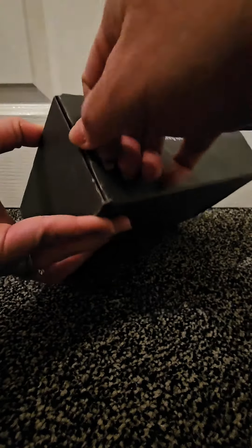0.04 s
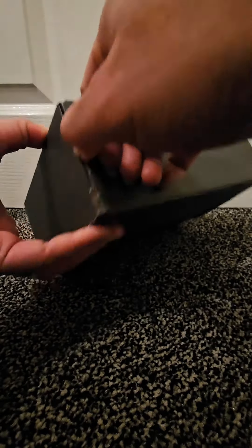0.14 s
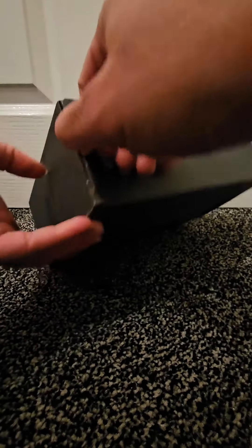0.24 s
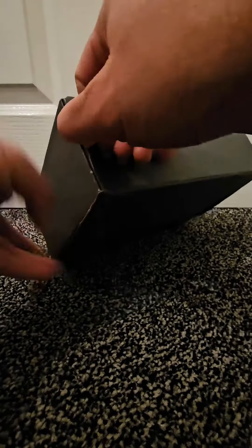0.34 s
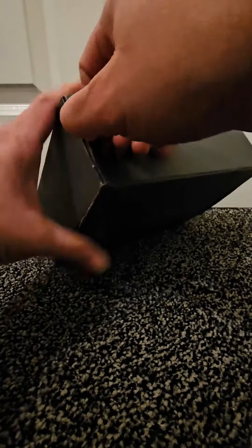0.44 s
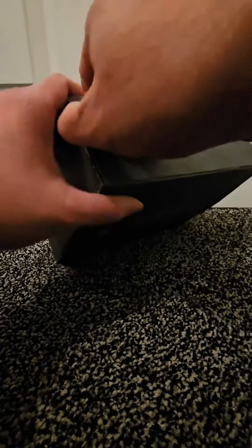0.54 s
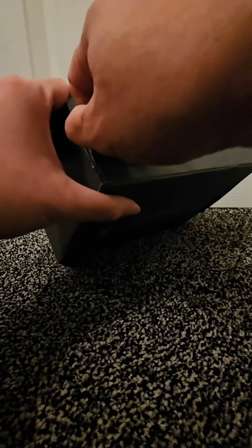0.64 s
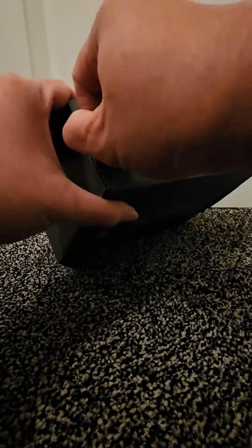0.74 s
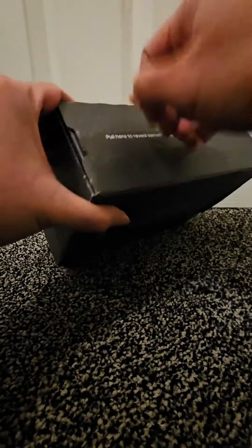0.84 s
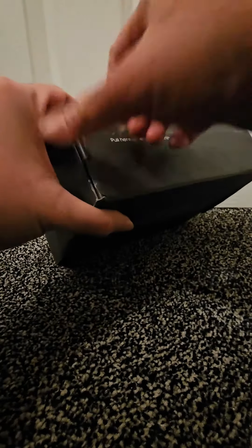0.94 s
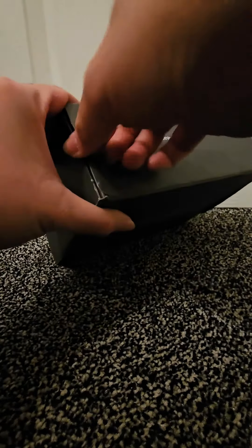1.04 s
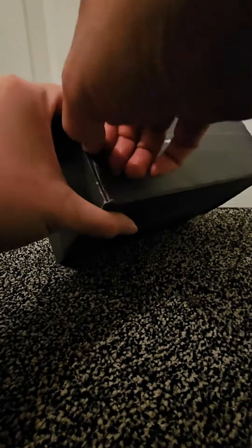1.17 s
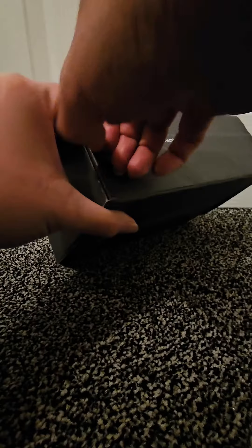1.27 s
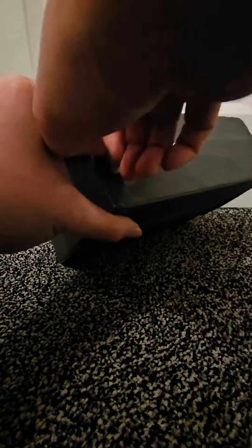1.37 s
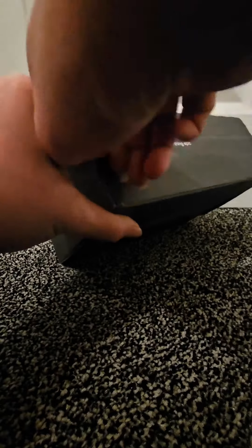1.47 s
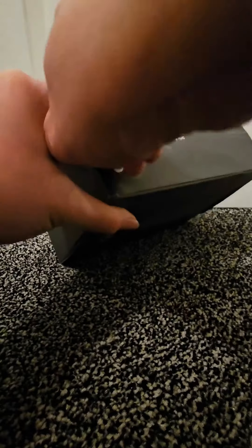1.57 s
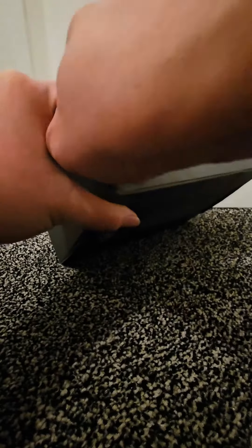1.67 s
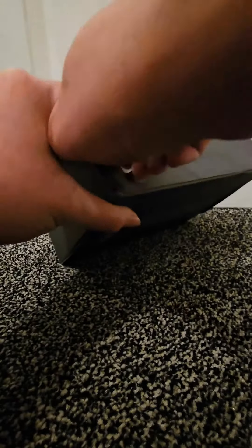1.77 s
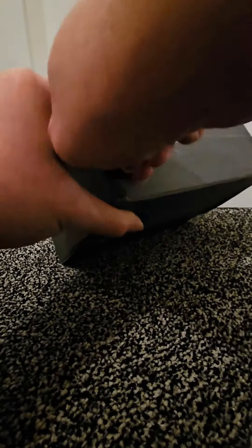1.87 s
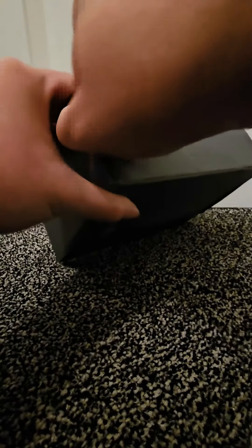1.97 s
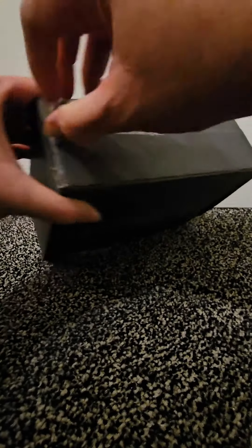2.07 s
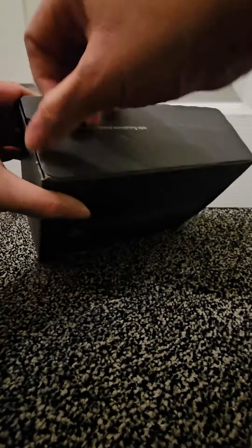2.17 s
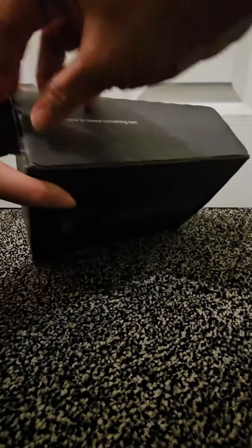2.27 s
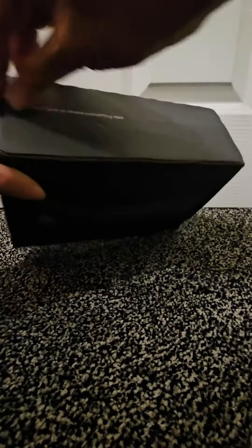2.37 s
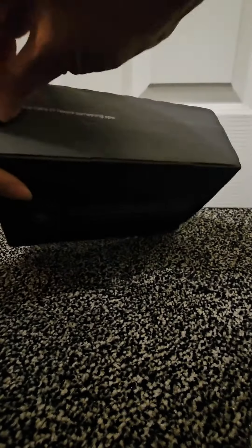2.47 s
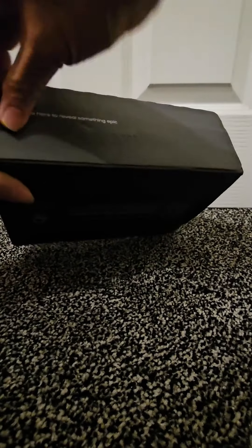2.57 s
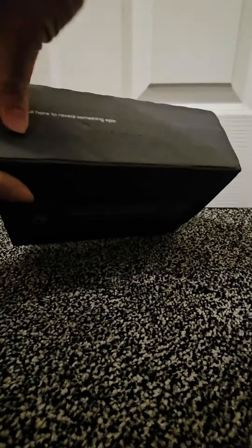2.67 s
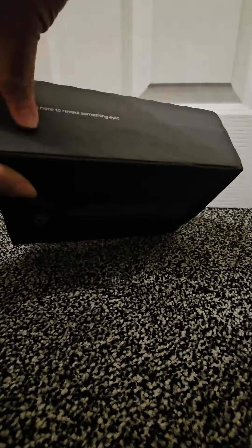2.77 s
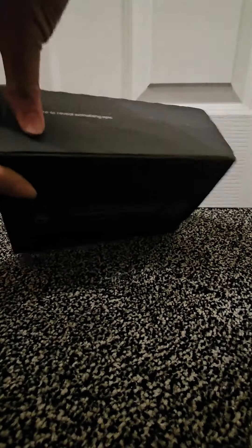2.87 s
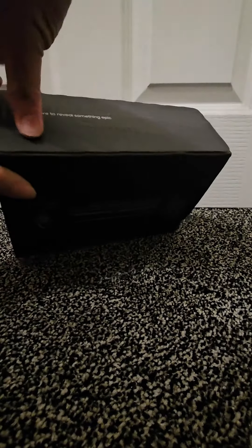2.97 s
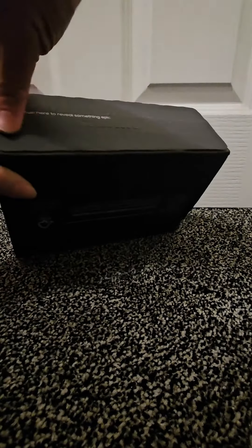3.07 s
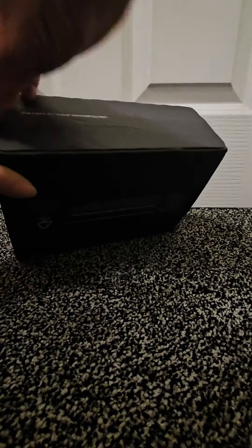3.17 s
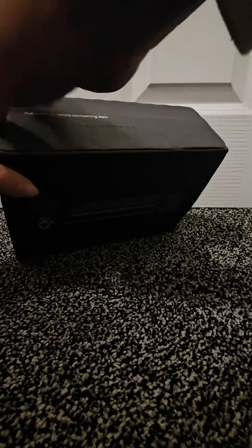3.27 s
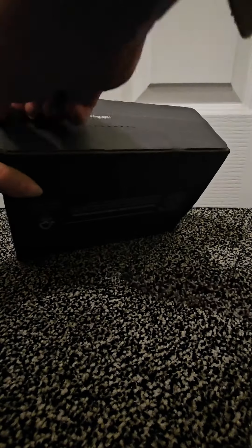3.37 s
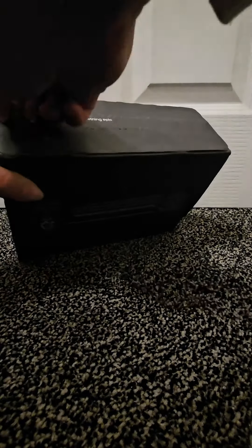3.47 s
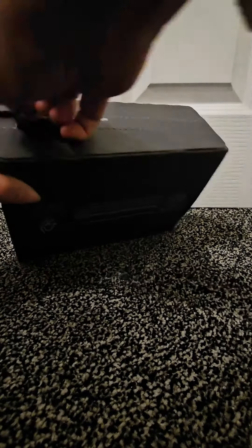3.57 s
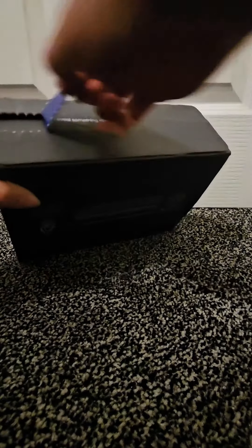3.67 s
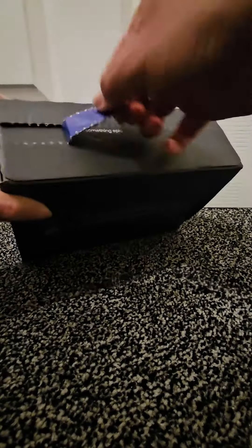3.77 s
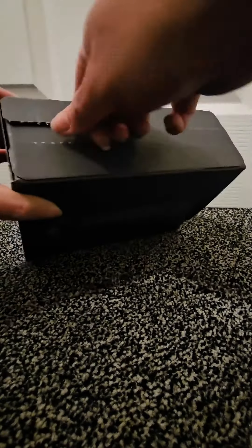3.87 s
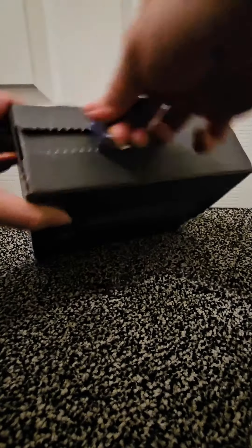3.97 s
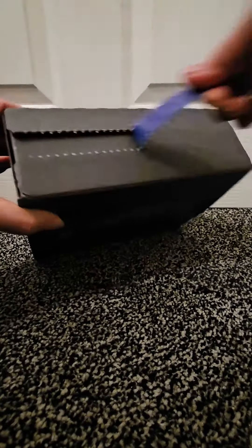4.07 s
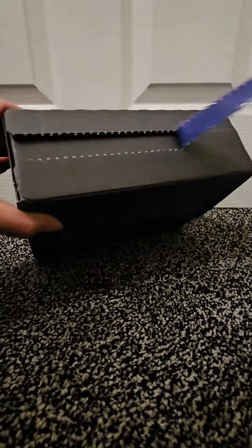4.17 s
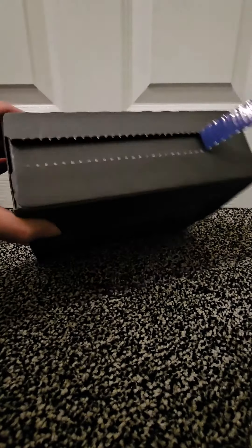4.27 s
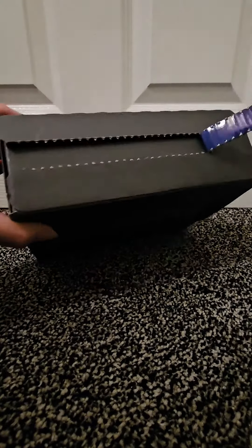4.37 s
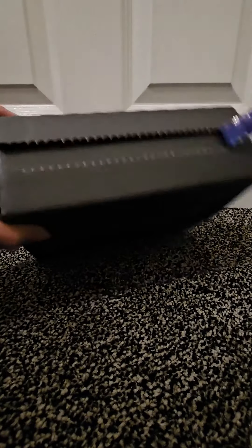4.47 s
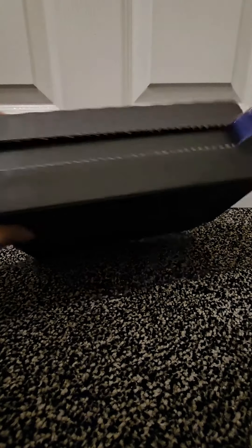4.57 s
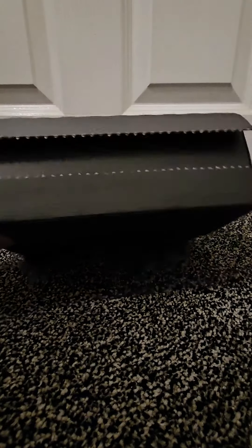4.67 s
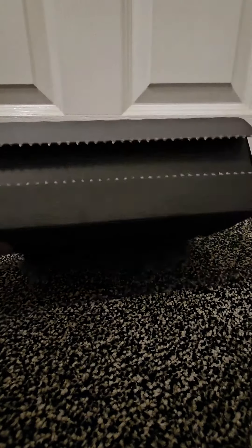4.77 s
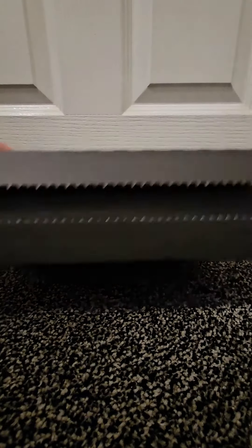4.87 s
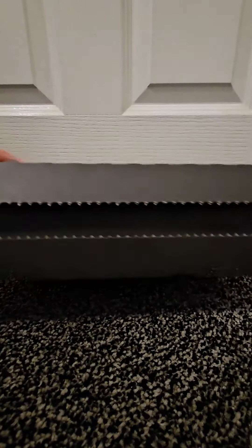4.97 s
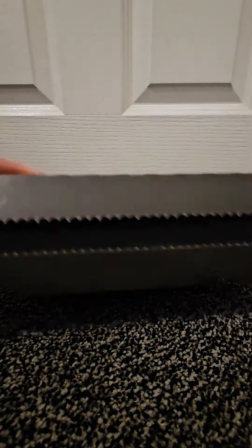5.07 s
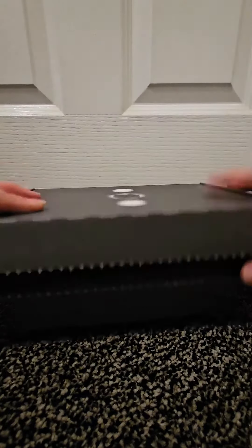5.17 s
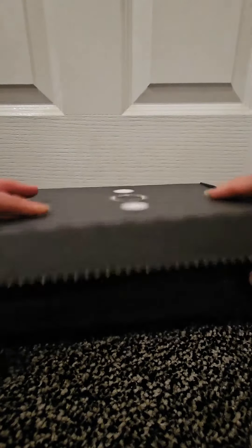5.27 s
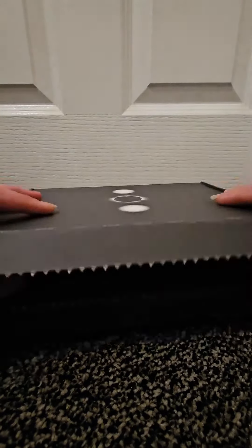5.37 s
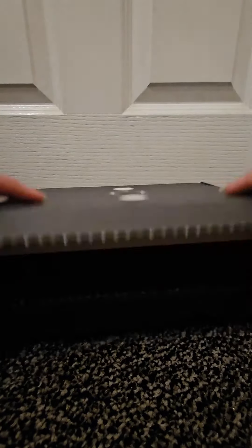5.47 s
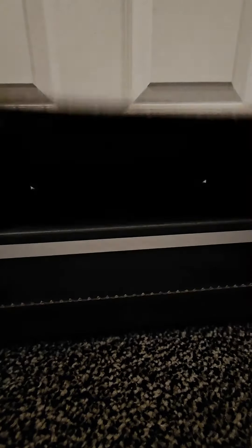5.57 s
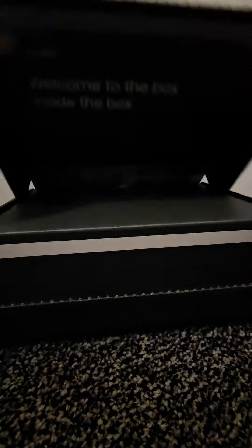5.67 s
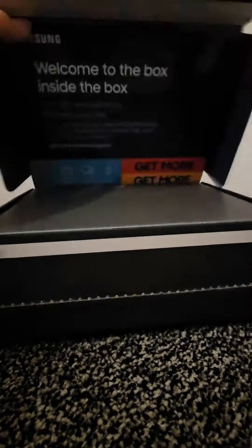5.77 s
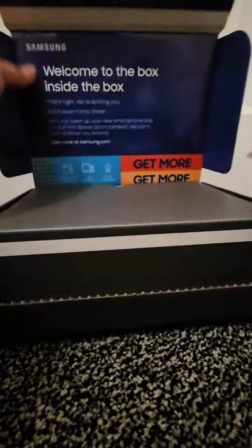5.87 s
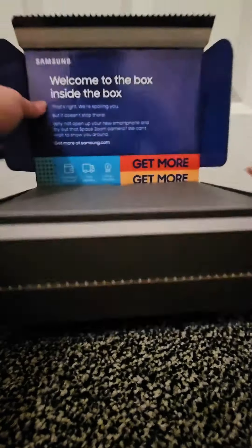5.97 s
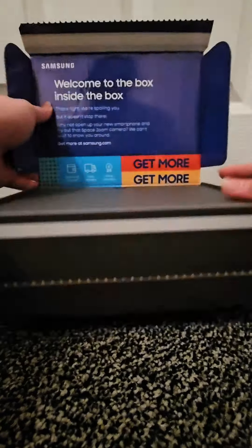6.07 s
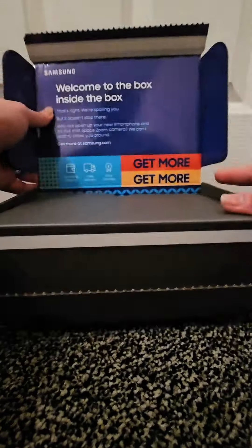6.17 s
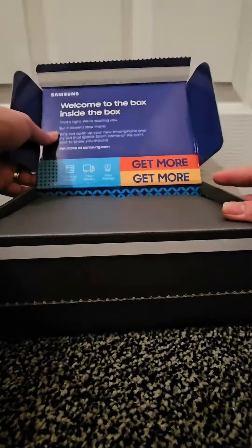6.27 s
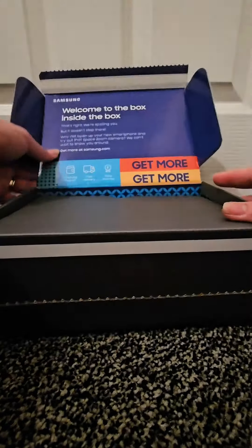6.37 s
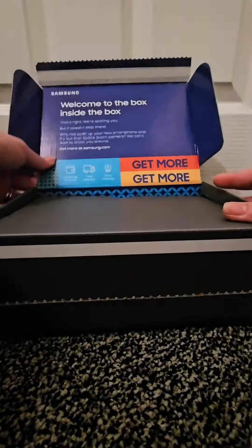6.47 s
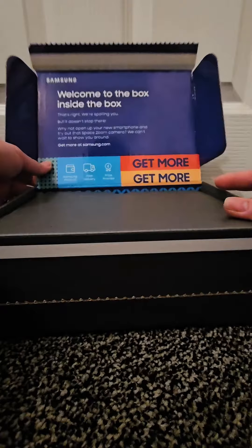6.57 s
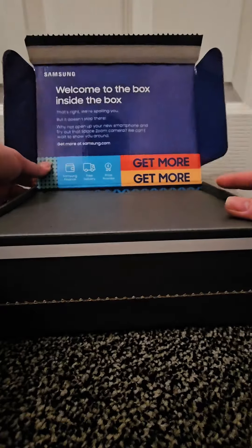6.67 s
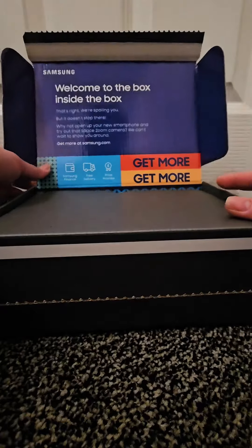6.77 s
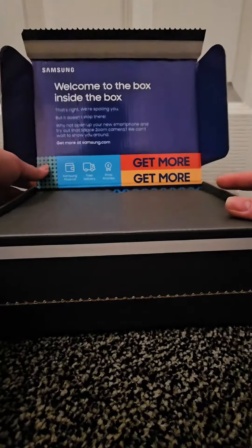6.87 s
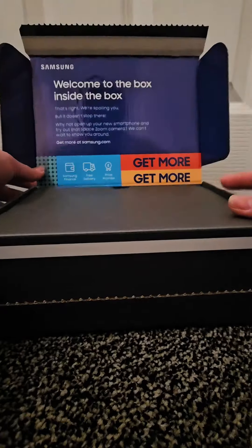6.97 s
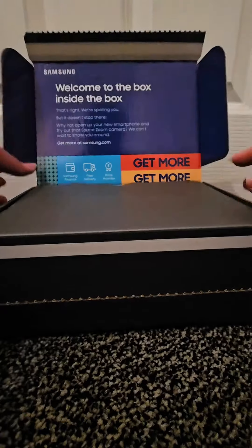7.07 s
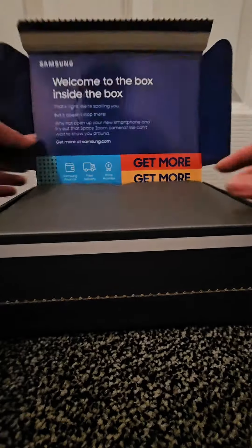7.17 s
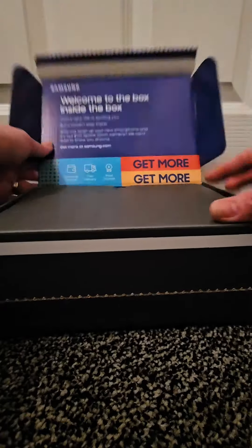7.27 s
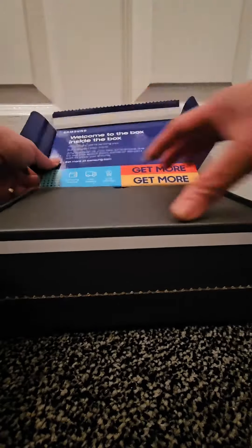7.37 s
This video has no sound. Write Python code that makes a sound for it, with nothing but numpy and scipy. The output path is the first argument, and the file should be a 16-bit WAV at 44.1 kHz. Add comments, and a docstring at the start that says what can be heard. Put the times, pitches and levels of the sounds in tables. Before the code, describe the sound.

A cardboard box is handled on carpet in a small, dry room, heard very close by a phone, the right side more muffled. From 0 to 2 s fingers scuff and pick at the card: faint rubs, tiny ticks, soft hollow taps, with firmer knocks near 1.0 and 1.7 s. From 2.2 to 3.6 s it is quieter, with light sliding strokes and a small nail snap around 3.4 s. At 3.75 s the strip starts to tear: a short crackling jerk, a pause, the longest and loudest rip at 4.2-4.45 s, then two shorter ones at 4.65 and 4.8 s, toothy and bright over hollow booming. Low bumps and rubs follow around 5-5.5 s. Near 5.8-6 s the flaps slide with a brief papery rush ending in a thud. Soft scuffs thin out to near quiet about 7 s; a double knock comes at 7.3 s.

```python
"""Two hands turn a cardboard box on a carpet, pick at its tab, rip a perforated strip and lift the lid.
Stroked, the box drums as noise through its resonances; knocked, its panels ring as decaying sines.
Skin and card scuff and hiss as coloured noise; fibres snap as short puffs. The room is small and dry.
A phone close by hears it through two far-apart ports, the right one muffled."""
import sys
import numpy as np
from scipy import signal
from scipy.fft import rfft, irfft, next_fast_len
from scipy.io import wavfile
from scipy.ndimage import uniform_filter1d, map_coordinates

SR = 44100
rng = np.random.default_rng(int(sys.argv[2]) if len(sys.argv) > 2 else 0)


def materialize(psi):
    """Save the field psi as 16-bit PCM at rate SR to the path in sys.argv[1].

    A 1-D psi becomes a single channel; in a 2-D psi each row is a channel.
    """
    bounded = np.clip(np.atleast_2d(psi).T, -1, 1)
    quanta = np.round(bounded * 32767).astype(np.int16)
    wavfile.write(sys.argv[1], SR, quanta)


N = 327222

# Room tone. Each row: frequency in Hz, density in dB per Hz.
ROOM_TONE_HZ_DB = [(15, -21.5), (25, -0.5), (210, -4.5), (306, -17), (633, -7.5), (1180, -22.5),
                   (1350, -21), (15600, -42.5)]
# Decay of the room. Each row: frequency in Hz, t60 in s.
ROOM_HZ_T60_S = [(200, 0.16), (2000, 0.017), (10000, 0.0092)]
# Port mismatch. Each row: frequency in Hz, excess of the left port over the right in dB.
MUFFLE_HZ_DB = [(60, 1.5), (110, 7.5), (200, -0.5), (380, -3.5), (700, 2), (1290, 4.0), (2380, 5),
                (4400, 16), (8120, 24.5), (15000, 21.5)]
# Ports seeing different faces as the box turns. Each row: time in s, mean phase lead of the right port in rad.
TURN_S_RAD = [(0, -1.33), (3, -0.28), (3.8, -0.5), (4.3, -1), (4.8, -2), (5.4, 1.75), (5.8, -0.16),
              (6.3, 1.3), (6.9, -0.5), (7.4, -1.4)]
# Colour drift as the box is turned. Each row: time in s, brightness tilt of the drumming in dB,
# tilt of the thump towards the bass in dB.
GRIP_S_DB = [(0, -1.5, -5.5), (1, -2, 3), (2, -7.5, -6.5), (3, -0.5, 2), (3.8, -12.5, 12), (4.5, 0, 15.5),
             (5.2, -3.5, -7.5), (6, 4.5, 2), (6.6, -1, 2.5), (7.3, -7, -8)]

# Box pressed into the carpet. Each row: start in s, length in s, thump in dB.
PRESSES = [(0.053, 0.26, -65.5), (0.437, 0.018, -51), (0.573, 0.057, -50.5), (0.746, 0.03, -59),
           (0.976, 0.022, -45), (1.093, 0.17, -68), (1.708, 0.026, -56.5), (1.912, 0.03, -59.5),
           (2.174, 0.22, -63.5), (2.425, 0.1, -59.5), (2.64, 0.28, -66.5), (3.07, 0.037, -57),
           (3.756, 0.028, -50.5), (3.85, 0.032, -38.5), (4.178, 0.27, -46.5), (4.66, 0.017, -39),
           (4.782, 0.084, -41.5), (4.984, 0.18, -57), (5.4, 0.032, -48.5), (5.684, 0.039, -44.5),
           (5.835, 0.057, -40.5), (5.982, 0.013, -33), (6.266, 0.083, -49), (6.4, 0.35, -66),
           (7.141, 0.0088, -60), (7.28, 0.047, -47)]
# Fingers sliding on the card. Each row: start in s, length in s, swell over the stroke in dB,
# drumming in dB, scuff in dB, hiss in dB.
STROKES = [(0.0, 0.0067, -5.5, -56.5, -52, -68), (0.05, 0.078, -3, -81, -79.5, -84),
           (0.14, 0.038, 2.5, -62, -64.5, -64), (0.22, 0.047, -2.5, -56.5, -66, -76.5),
           (0.3, 0.037, -2, -66, -77.5, -86), (0.35, 0.14, 7.5, -57.5, -61.5, -69.5),
           (0.525, 0.033, 6, -52.5, -59.5, -69), (0.6, 0.08, 9, -63.5, -75, -80),
           (0.73, 0.06, -5.5, -54.5, -66, -68.5), (0.8, 0.13, 11.5, -59.5, -78, -88),
           (0.975, 0.0085, 5.5, -35, -42, -53), (1.01, 0.028, 3, -56.5, -76, -80),
           (1.1, 0.083, 13, -67, -92, -95), (1.21, 0.037, 16, -67.5, -66, -71.5),
           (1.29, 0.017, 4, -55, -65, -68.5), (1.39, 0.017, -11, -51.5, -72, -67.5),
           (1.5, 0.042, 18, -59, -74, -81), (1.58, 0.052, -8.5, -53.5, -71, -73),
           (1.68, 0.041, 14, -43.5, -69.5, -72), (1.91, 0.051, 8, -61, -77, -74),
           (2.03, 0.0074, 2, -68.5, -71.5, -65.5), (2.07, 0.0084, 4, -66, -68, -66),
           (2.17, 0.18, 4.5, -53, -58, -66.5), (2.385, 0.033, -3, -64, -70, -76),
           (2.43, 0.23, -11.5, -58, -62.5, -66), (2.64, 0.055, 10, -58.5, -61, -66.5),
           (2.72, 0.08, -1, -62, -66, -70), (2.82, 0.067, 2, -57.5, -67, -69.5),
           (2.92, 0.027, -1, -63.5, -67.5, -69), (2.97, 0.06, 3, -74, -84, -84),
           (3.045, 0.055, 5.5, -56, -67.5, -69), (3.155, 0.15, -3, -69, -74, -71),
           (3.33, 0.056, -5, -60, -66.5, -74), (3.425, 0.016, -2.5, -46.5, -59, -58),
           (3.51, 0.11, 2, -59, -68.5, -72), (3.65, 0.071, 2, -58.5, -69, -66),
           (3.97, 0.014, -1, -53.5, -63.5, -65.5), (4.015, 0.0074, -3.5, -41, -64, -59),
           (4.05, 0.14, -5.5, -58.5, -66, -68.5), (4.56, 0.05, -9.5, -52.5, -74.5, -74),
           (4.72, 0.03, 3.5, -54, -64.5, -65), (4.97, 0.06, -4.5, -52.5, -72, -78),
           (5.04, 0.051, 1, -49, -61, -64.5), (5.135, 0.027, -2, -48, -51.5, -63.5),
           (5.2, 0.14, 1, -64, -62.5, -71), (5.37, 0.049, -3, -51.5, -57.5, -63.5),
           (5.43, 0.06, 5.5, -56.5, -63, -64.5), (5.52, 0.09, -16, -56, -61.5, -69.5),
           (6.06, 0.015, -15, -68, -62, -77), (6.1, 0.012, 2.5, -59, -49, -57.5),
           (6.15, 0.03, -6.5, -55.5, -66.5, -71), (6.212, 0.045, 4, -59, -52.5, -57.5),
           (6.262, 0.087, -5.5, -57.5, -66, -70), (6.41, 0.034, -2, -53.5, -58.5, -65.5),
           (6.51, 0.22, -4, -56.5, -64, -65.5), (6.76, 0.16, -9, -68, -81, -99.5),
           (7.16, 0.12, 13.5, -51, -62, -75.5), (7.305, 0.017, 2, -39.5, -43.5, -61),
           (7.35, 0.0078, -5, -75.5, -64.5, -73)]
# Pulls on the strip. Each row: start in s, length in s, swell over the pull in dB,
# drumming in dB, scuff in dB, hiss in dB.
TUGS = [(3.753, 0.033, -3.5, -38.5, -43.5, -43.5), (3.827, 0.068, 1.5, -28, -39.5, -41),
        (4.172, 0.27, -1.5, -22, -35.5, -39), (4.633, 0.043, -2.5, -26, -37.5, -43),
        (4.775, 0.078, -9, -30, -35.5, -42)]
# Lid flaps sliding out. Each row: time in s, level in dB.
LID_SLIDE_S_DB = [(5.58, -59), (5.6, -62.5), (5.828, -42.5), (6.01, -49), (6.02, -72.5), (6.046, -79),
                  (6.05, -69.5)]
# Taps and knocks on the box. Each row: time in s, level in dB, crack over that level in dB,
# pitch of the struck panel in Hz.
KNOCKS = [(0.262, -42.5, -27, 193), (0.441, -26, -22, 205), (0.725, -39, -36, 225), (0.985, -17, -9, 534),
          (1.024, -27, -36, 205), (1.152, -32.5, -32, 400), (1.172, -35, -37, 227), (1.3, -40.5, -15, 197),
          (1.388, -30, -6.5, 238), (1.479, -45.5, -28, 215), (1.544, -36, -37, 220),
          (1.58, -40.5, -22, 197), (1.688, -31.5, -40, 212), (1.711, -19, -35, 215), (1.726, -31, -33, 616),
          (1.759, -29.5, -34.5, 330), (1.771, -33, -27, 340), (2.03, -50, -3.5, 249),
          (2.162, -40.5, -7, 256), (2.353, -34.5, -24, 268), (2.432, -29, -27, 248),
          (2.854, -39.5, -20, 232), (2.933, -42.5, -15, 234), (3.066, -34.5, -6.5, 257),
          (3.089, -31, -21, 187), (3.328, -39.5, -30, 267), (3.431, -33, -35, 260),
          (3.504, -33.5, -33, 283), (3.736, -32, -2.5, 242), (3.745, -33.5, 6.5, 262),
          (3.836, -14, -16, 264), (4.011, -20, -15.5, 266), (4.173, -17, -22, 262),
          (4.208, -17.5, -14, 245), (4.309, -12, -22, 249.6), (4.443, -8.5, -15, 564),
          (4.559, -21.5, -29, 173), (4.631, -14, -21.5, 251), (4.658, -12.5, -11.5, 263),
          (4.763, -34.5, -6.5, 250), (4.982, -33, -38.5, 223), (5.079, -27, -23, 240),
          (5.132, -21, -10.5, 830), (5.399, -32, -15.5, 610), (5.977, -19.5, -26, 277),
          (6.138, -41.5, -18, 260), (6.257, -36, -30, 644), (6.338, -34, -22, 654), (6.415, -46.5, -6, 326),
          (7.061, -54.5, -24.5, 312.7), (7.138, -33.5, -38, 254), (7.281, -21, -35, 246),
          (7.31, -17, -21, 1640)]
# Fibres and nail tips snapping. Each row: time in s, level in dB.
SNAPS_S_DB = [(0.0129, -40), (0.1183, -49), (0.242, -47.5), (0.29, -53), (0.9635, -32.5), (1.7185, -42),
              (2.167, -39), (2.707, -43.5), (3.1563, -49), (3.1805, -51), (3.4344, -25), (3.6671, -45),
              (3.702, -44), (3.717, -39.5), (3.7445, -20.5), (3.807, -35.5), (3.8323, -17), (3.8384, -23),
              (3.8498, -17), (3.87, -19), (3.891, -16), (4.022, -40.5), (4.1774, -26), (4.192, -14),
              (4.203, -12.5), (4.2569, -9.5), (4.3093, -21.5), (4.316, -15), (4.326, -27), (4.3503, -13),
              (4.3845, -18), (4.397, -12), (4.634, -27.5), (4.651, -14), (4.6743, -19), (4.7301, -44.5),
              (4.7369, -41.5), (4.786, -20.5), (4.802, -13.5), (4.8222, -10.5), (4.859, -28), (5.1412, -46),
              (5.9813, -38), (7.318, -35)]

# Resonances of panels and cavity. Each row: centre in Hz, width in Hz, level in dB.
BOX = [(204.5, 48, -4), (261.1, 61, 2.5), (351, 98, -4.5), (503, 70.4, -1), (592.7, 91, -0.5),
       (669.5, 89, -3.5), (810.6, 68, -6.5), (1266, 130, -16), (1640, 90, -22.5)]
# Spectrum of the thump. Each row: frequency in Hz, density in dB per Hz.
THUMP_HZ_DB = [(15, -34), (25, -14), (70, 4.5), (150, 1.5), (200, -18.5), (330, -120)]
# Hands on the closed box, mid range. Each row: frequency in Hz, density in dB per Hz.
SCUFF_HZ_DB = [(560, -31), (950, -6), (1190, -7), (1570, -9.5), (1820, -15.5), (3550, -15.5), (5700, -19.5),
               (7410, -50), (12500, -120)]
# Strip tearing, mid range. Each row: frequency in Hz, density in dB per Hz.
RIP_HZ_DB = [(560, -30.5), (950, 0), (1100, -10.5), (1250, -1), (2630, -8), (2920, -5), (3220, -7),
             (4520, -3.5), (5700, -11.5), (7410, -48), (12500, -120)]
# Hands on the opened box, mid range. Each row: frequency in Hz, density in dB per Hz.
LID_HZ_DB = [(560, -53), (950, -17.5), (1370, -10), (1640, -7), (2000, -13.5), (2670, -18), (2880, -14.5),
             (3550, -16), (3860, -11.5), (5130, -16), (5700, -22), (7410, -23.5), (12500, -120)]
# Smooth card on smooth card. Each row: frequency in Hz, density in dB per Hz.
FLAPS_HZ_DB = [(240, -42), (400, -9.5), (520, -5), (730, -20), (986, -9.5), (1970, -14), (2170, -13),
               (2690, -18.5), (4970, -16.5), (8000, -31), (10400, -52), (17600, -120)]
# Treble of skin, fibres and strip. Each row: frequency in Hz, density in dB per Hz.
HISS_HZ_DB = [(3410, -22), (5800, -7.5), (6790, -3.5), (7590, 0), (9610, -5.5), (10400, -12.5), (11700, -2),
              (15000, -5.5), (15600, -3)]

ROOM_TONE_DB, ROOM_ANSWER_DB, TOP_HZ = -73, -18, 15700
PRESS_RISE_DB_PER_S, PRESS_FALL_DB_PER_S = 350, 420
RESTING_THUMP_DB = -72  # box merely held
STROKE_RISE_DB_PER_S, STROKE_FALL_DB_PER_S = 960, 710
TUG_RISE_DB_PER_S, TUG_FALL_DB_PER_S = 1530, 770
TUG_EDGE_S = .03  # the strip is heard this long before and after a pull
LID_OPENS_S = 5.5
LID_DRUM_DB, LID_HISS_DB = -2, -6.5  # over the slide level
CRACK_T60_S, CRACK_RISE_S = 0.024, .0005
RING_RISE_S, SOFTER_DB = 0.0015, 23.5  # rise at 0 dB crack; doubles per SOFTER_DB less crack
RING_LOSS_DB_PER_S = 120  # lost to the hands
AWAY_DB_PER_OCTAVE = 27  # weaker away from the struck panel
TEETH_PER_S, TEETH_SCUFF_DB, TEETH_HISS_DB = 115, -4, -0.5


def amp(db):
    """Gain of a level in dB."""
    return 10 ** (np.asarray(db) / 20)


def unit(x):
    """x at rms 1."""
    return x / np.sqrt(np.mean(x ** 2) + 1e-20)


def along(points, hz):
    """(Hz, value) points interpolated on a log axis."""
    f, v = np.transpose(points)
    return np.interp(np.log(hz + 1), np.log(f + 1), v)


def curves(rows):
    """One value per sample for each column after the time."""
    s, *cols = np.transpose(sorted(rows))
    return [np.interp(np.arange(N) / SR, s, c) for c in cols]


def wobble(rate_hz):
    """Smooth random curve, rate_hz knots a second."""
    knots = rng.standard_normal(int(N * rate_hz / SR) + 4)
    return map_coordinates(knots, [np.arange(N) * rate_hz / SR])


def filtered(x, response):
    """x through a complex response of frequency."""
    m = next_fast_len(N + SR // 8, real=True)
    return irfft(rfft(x, m) * response(np.fft.rfftfreq(m, 1 / SR)), m)[..., :N]


def coloured(x, spectrum):
    """x through a spectrum; white noise of rms 1 leaves at rms 1."""
    grid_hz = np.linspace(0, SR / 2, 4000)
    scale = np.sqrt(np.mean(amp(along(spectrum, grid_hz)) ** 2))
    return filtered(x, lambda hz: amp(along(spectrum, hz)) / scale)


def tilted(whole, split_hz, tilt_db):
    """The part above split_hz gains what the part below loses."""
    upper = filtered(whole, lambda hz: 1 / (1 + (split_hz / (hz + 1)) ** 6))
    return amp(tilt_db / 2) * upper + amp(-tilt_db / 2) * (whole - upper)


def puff(t, level_db, t60_s, rise_s):
    """Noise with a quick rise and an exponential decay, independent in each port."""
    envelope = amp(level_db - 60 * t / t60_s) * (1 - np.exp(-t / rise_s))
    return envelope * rng.standard_normal((2, len(t)))


def bursts(times_s, levels_db, t60_s, rise_s):
    """Puffs of noise at the given times."""
    out, t = np.zeros((2, N + SR)), np.arange(SR // 10) / SR
    for s, db in zip(times_s, levels_db):
        out[:, round(s * SR):][:, :len(t)] += puff(t, db, t60_s, rise_s)
    return out[:, :N]


def friction(rate_hz, depth_db, patchy_db=0):
    """Two unrelated noises that catch and slip together; their colour shifts in patches."""
    z = signal.stft(rng.standard_normal((2, N)), nperseg=512)[2]
    field = rng.standard_normal(z.shape[1:])
    field = uniform_filter1d(uniform_filter1d(field, 3, 0), 9, 1)
    pair = unit(signal.istft(z * amp(patchy_db * unit(field)), nperseg=512)[1][:, :N])
    grip = amp(depth_db * wobble(rate_hz))
    return pair * grip / np.sqrt(uniform_filter1d(grip ** 2, SR // 12))


def swells(start_s, length_s, swell_db, levels_db, rise, fall):
    """Gain per level column: each gesture rises, swells and falls (dB per s); their powers add."""
    t = np.arange(0, N / SR + .002, .001)[:, None]
    held_db = swell_db * np.clip((t - start_s) / length_s - .5, -.5, .5)
    before_db = rise * np.clip(start_s - t, 0, None)
    after_db = fall * np.clip(t - start_s - length_s, 0, None)
    power = amp(2 * (held_db - before_db - after_db)) @ amp(2 * np.transpose(levels_db))
    return np.array([np.interp(np.arange(N) / SR, t[:, 0], np.sqrt(p)) for p in power.T])


def room_tone():
    """Faint steady noise with the room's spectrum."""
    return amp(ROOM_TONE_DB) * coloured(rng.standard_normal((2, N)), ROOM_TONE_HZ_DB)


def room(x):
    """Room answer: a noise tail in which each frequency dies at its own speed."""
    hz, t, z = signal.stft(rng.standard_normal((2, SR // 3)), SR, nperseg=256)
    decay = amp(-60 * t / along(ROOM_HZ_T60_S, hz)[:, None])
    tail = signal.istft(z * decay, SR, nperseg=256)[1]
    return signal.fftconvolve(x, tail / np.linalg.norm(tail[0]), axes=1)[:, :N]


def ports(pair, alike, lag_samples):
    """The right port hears part of the left's sound, later and turned in phase, and part its own."""
    lead_rad = curves(TURN_S_RAD)[0] + wobble(5.1)
    analytic = signal.hilbert(pair[0], next_fast_len(N))[:N]
    shared = np.real(analytic * np.exp(1j * lead_rad))
    right = alike * shared + np.sqrt(1 - alike ** 2) * pair[1]
    return np.array([pair[0], np.roll(right, lag_samples)])


def thump():
    """Pressing the box into the carpet: uneven low noise over a faint resting level."""
    start_s, length_s, db = np.transpose(PRESSES)
    presses = swells(start_s, length_s, 0, [db], PRESS_RISE_DB_PER_S, PRESS_FALL_DB_PER_S)[0]
    deep_db = curves(GRIP_S_DB)[1]
    rumble = coloured(friction(25, 5), THUMP_HZ_DB)
    return np.hypot(presses, amp(RESTING_THUMP_DB)) * tilted(rumble, 85, -deep_db)


def sliding():
    """Gain of the lid's slide."""
    t = np.arange(N) / SR
    moving = (t > LID_SLIDE_S_DB[0][0]) & (t < LID_SLIDE_S_DB[-1][0])
    return moving * amp(curves(LID_SLIDE_S_DB)[0])


def flaps():
    """Lid flaps slide out of the box: an even rush of card on card."""
    rush = coloured(rng.standard_normal((2, N)), FLAPS_HZ_DB)
    return sliding() * amp(1.2 * wobble(150)) * rush


def snaps():
    """Fibres and nail tips let go: bright puffs a few milliseconds long."""
    s, db = np.transpose(SNAPS_S_DB)
    return coloured(bursts(s, db, t60_s=0.014, rise_s=0.00083), HISS_HZ_DB)


def panel_ring(t, struck_hz):
    """Decaying sines of the box, strongest near the struck panel, strengths random per port."""
    strengths_db = rng.normal(0, 2.5, (len(BOX), 2, 1))
    out = 0
    for (hz, width_hz, db), strength_db in zip(BOX, strengths_db):
        away_db = AWAY_DB_PER_OCTAVE * abs(np.log2(hz / struck_hz))
        decay = np.exp(-np.pi * width_hz * .7 * t)  # rings longer than the full width gives
        out = out + amp(.5 * db + strength_db - away_db) * decay * np.sin(2 * np.pi * hz * t)
    return out


def knocks():
    """Each blow rings the panels and cracks at the contact; the less crack, the slower the ring rises."""
    ring, crack, t = np.zeros((2, N + SR)), np.zeros((2, N + SR)), np.arange(SR // 5) / SR
    for s, db, crack_db, panel_hz in KNOCKS:
        span = slice(round(s * SR), round(s * SR) + len(t))
        rise_s = RING_RISE_S * 2 ** (-crack_db / SOFTER_DB)
        envelope = amp(db - RING_LOSS_DB_PER_S * t) * (1 - np.exp(-t / rise_s))
        ring[:, span] += envelope * panel_ring(t, panel_hz)
        crack[:, span] += puff(t, db + crack_db, CRACK_T60_S, CRACK_RISE_S)
    return ring[:, :N], crack[:, :N]


def effort():
    """Gains of drumming, scuff and hiss under strokes and pulls; the sliding lid drums and hisses too."""
    start_s, length_s, swell_db, *levels_db = np.transpose(STROKES)
    strokes = swells(start_s, length_s, swell_db, levels_db, STROKE_RISE_DB_PER_S, STROKE_FALL_DB_PER_S)
    start_s, length_s, swell_db, *levels_db = np.transpose(TUGS)
    tugs = swells(start_s, length_s, swell_db, levels_db, TUG_RISE_DB_PER_S, TUG_FALL_DB_PER_S)
    lid = sliding() * np.array([[amp(LID_DRUM_DB)], [0], [amp(LID_HISS_DB)]])
    return np.sqrt(strokes ** 2 + tugs ** 2 + lid ** 2)


def pull_spans_s():
    """(from, to) of every pull on the strip, edges included."""
    return [(s - TUG_EDGE_S, s + length + TUG_EDGE_S) for s, length, *_ in TUGS]


def teeth():
    """Bridges of the perforation let go one after another, unevenly."""
    times_s = np.concatenate([np.arange(a, b, 1 / TEETH_PER_S) for a, b in pull_spans_s()])
    chance = rng.normal(0, 1, (len(times_s), 2))
    uneven_s = times_s + .45 / TEETH_PER_S * chance[:, 0]
    return bursts(uneven_s, 8 + 4 * chance[:, 1], t60_s=.02, rise_s=.0004)


def ticks():
    """Sparse ticks of skin on card at random times while the box is closed."""
    chance = rng.random((130, 2))
    levels_db = 3 - 6 * np.log(chance[:, 1] + 0.043)
    return bursts(chance[:, 0] * LID_OPENS_S, levels_db, t60_s=0.021, rise_s=0.0006)


def card(x):
    """Mid-range colour of a touch: closed box, tearing strip or opened box."""
    t = np.arange(N) / SR
    tearing = np.any([(t > a) & (t < b) for a, b in pull_spans_s()], axis=0) * 1.0
    opened = t > LID_OPENS_S
    closed = coloured(x * (1 - tearing - opened), SCUFF_HZ_DB)
    return closed + coloured(x * tearing, RIP_HZ_DB) + coloured(x * opened, LID_HZ_DB)


def box(hz):
    """Causal response of the box: resonances of alternating sign."""
    total = 0
    for k, (centre, width, db) in enumerate(BOX):
        damping = 1j * hz * width
        total = total + (-1) ** k * amp(db) * damping / (centre * centre - hz * hz + damping)
    return total


def drumming(gain):
    """Hollow box driven by catch-and-slip friction."""
    bright_db = curves(GRIP_S_DB)[0]
    box_rms = np.sqrt(np.mean(abs(box(np.linspace(0, SR / 2, 4000))) ** 2))
    drive = gain * friction(45, 5.65, patchy_db=1.5) / box_rms
    return tilted(filtered(drive, box), 370, bright_db)


def rubbing():
    """Skin slides on card and the strip tears tooth by tooth: drumming, uncoloured scuff and hiss."""
    drum_gain, scuff_gain, hiss_gain = effort()
    bridges = teeth()
    scuff = friction(110, 1.0, patchy_db=5) + amp(TEETH_SCUFF_DB) * bridges
    treble = friction(160, 0.98, patchy_db=3.5) + ticks() + amp(TEETH_HISS_DB) * bridges
    return drumming(drum_gain), scuff_gain * scuff, hiss_gain * coloured(treble, HISS_HZ_DB)


def scene():
    """The box at two ports, its answer from the room and the room's faint tone."""
    drum, scuff, hiss = rubbing()
    ring, crack = knocks()
    low = ports(thump(), alike=.75, lag_samples=0)
    hollow = ports(drum + ring, alike=0.37, lag_samples=17)
    mid = ports(card(scuff + crack) + flaps(), alike=0.59, lag_samples=23)
    near = low + hollow + mid + hiss + snaps()
    return near + amp(ROOM_ANSWER_DB) * room(near) + room_tone()


def record(dry):
    """Port balance per frequency at constant summed power gain, then a steep cut near TOP_HZ."""
    def response(hz):
        right = amp(-along(MUFFLE_HZ_DB, hz))
        edge = amp(-np.clip(hz - TOP_HZ + 250, 0, None) ** 2 / 3000)  # cut begins 250 Hz below TOP_HZ
        return 2 * np.array([np.ones_like(hz), right]) / np.sqrt(1 + right ** 2) * edge
    return filtered(dry, response)


dry = scene()
out = record(dry)
materialize(out)
```